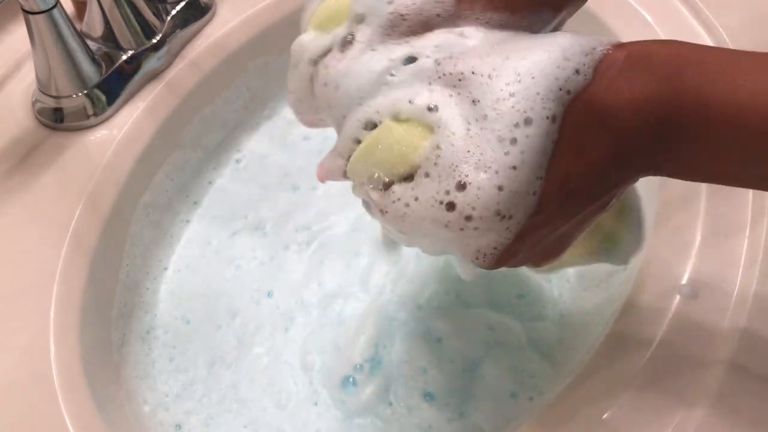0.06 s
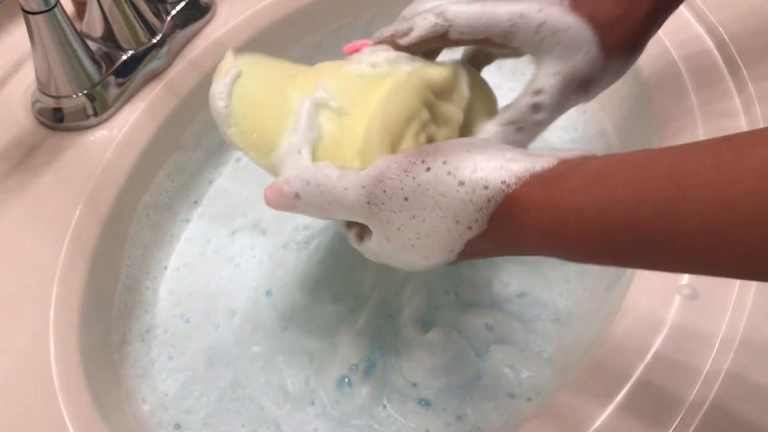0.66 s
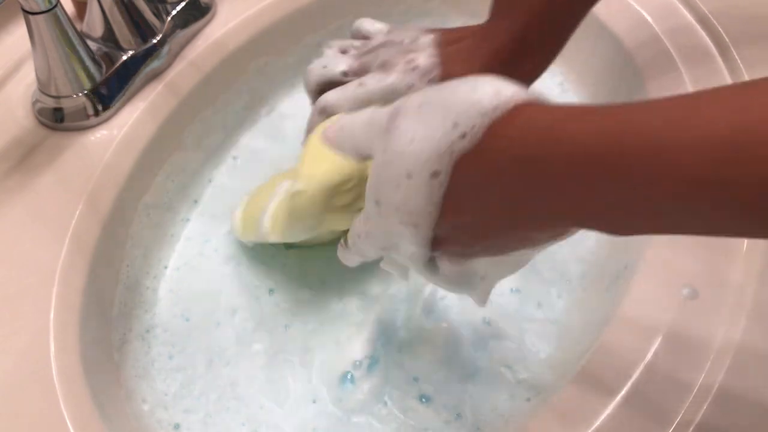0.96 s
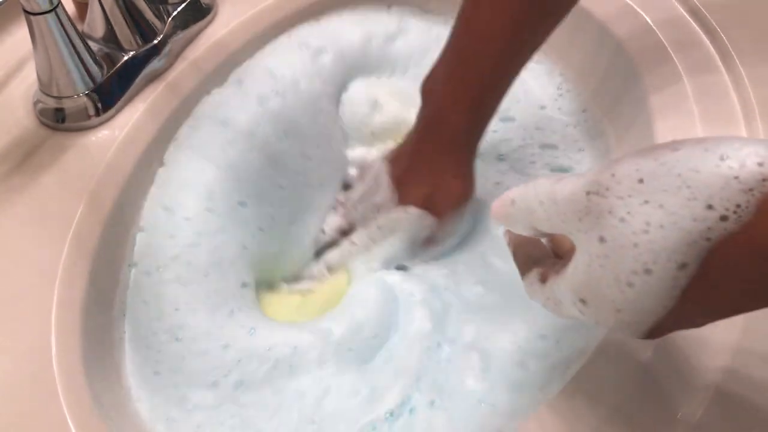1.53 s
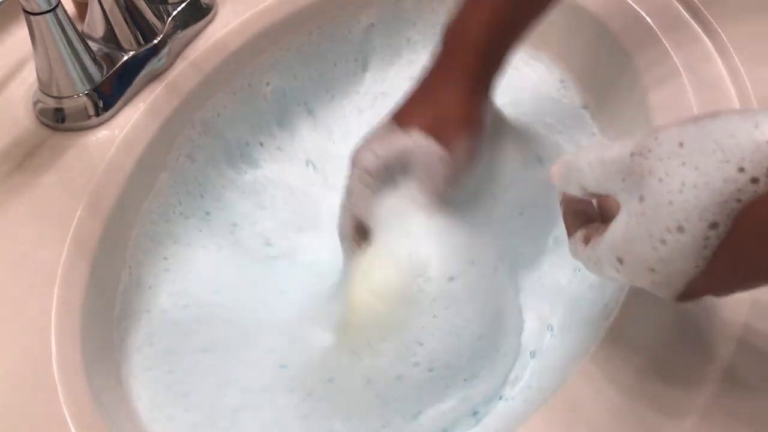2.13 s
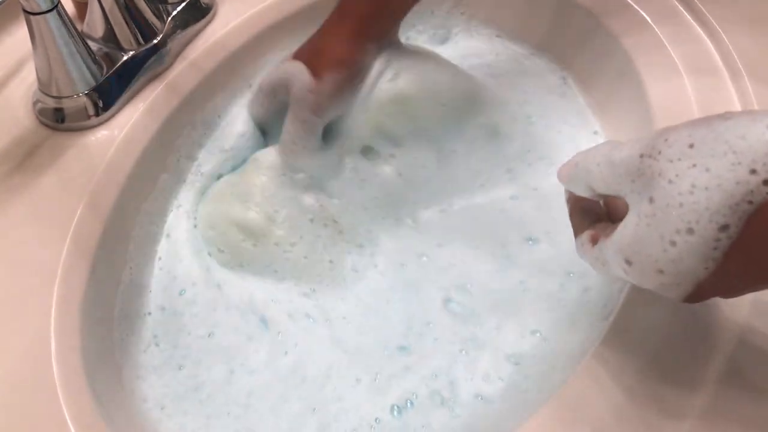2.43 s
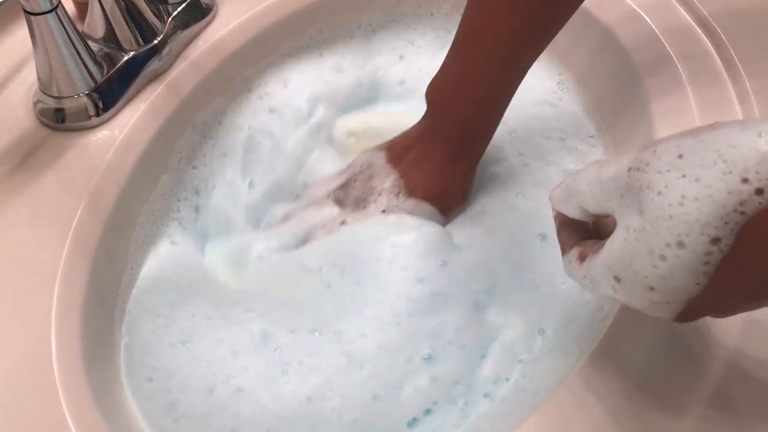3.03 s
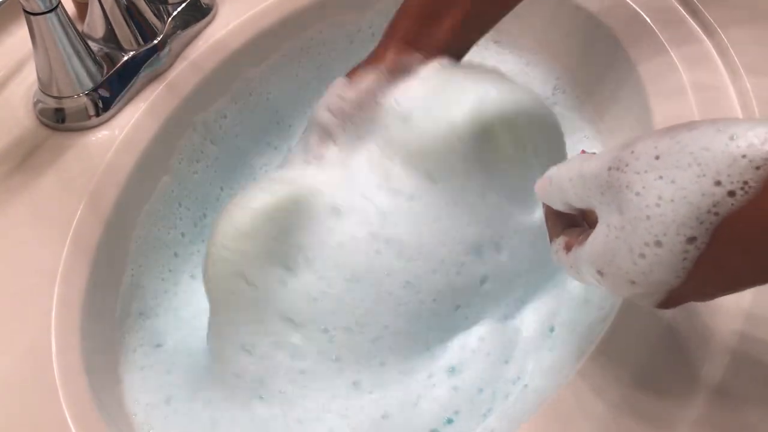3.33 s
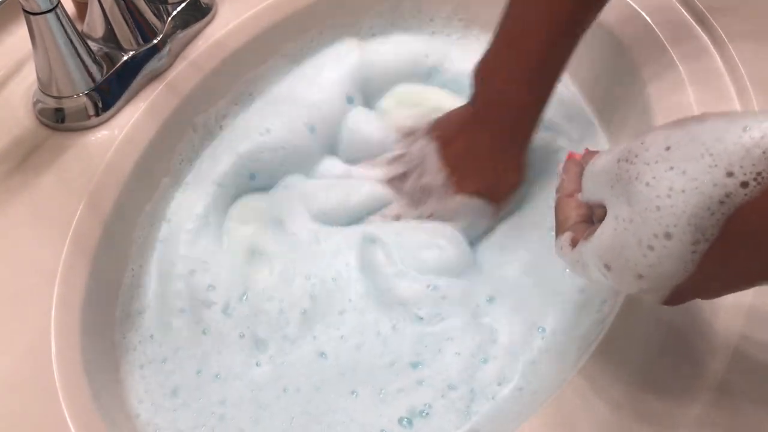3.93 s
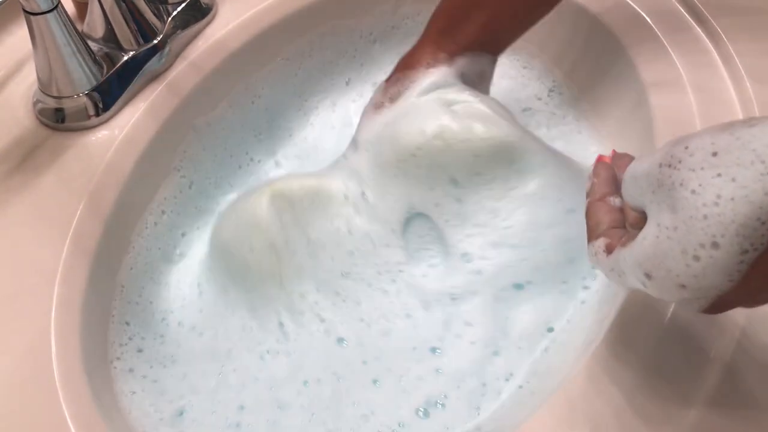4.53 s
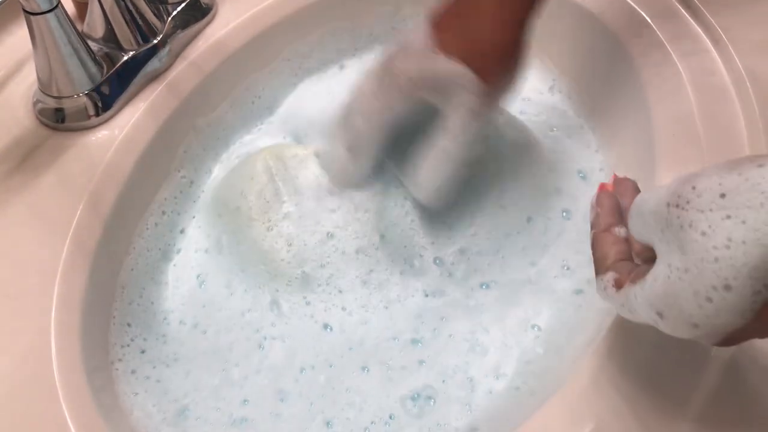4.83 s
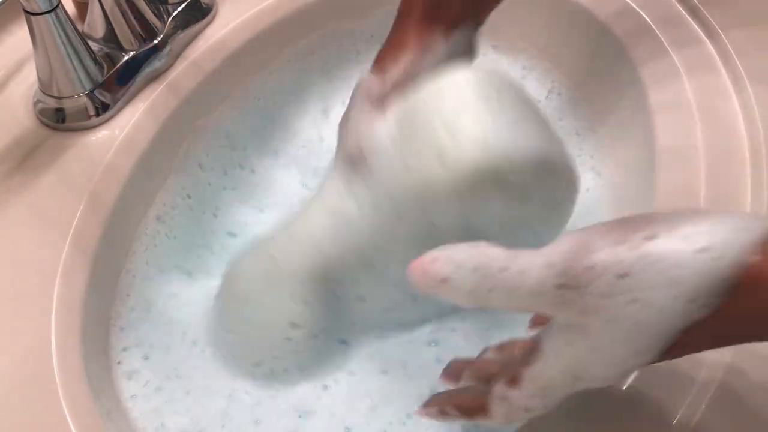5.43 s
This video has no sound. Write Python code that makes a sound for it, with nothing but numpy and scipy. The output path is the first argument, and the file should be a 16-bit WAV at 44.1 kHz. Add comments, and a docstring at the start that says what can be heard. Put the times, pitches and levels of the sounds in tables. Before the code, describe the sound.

A soapy sponge is wrung out over a sink with a wet, crackling hiss, then slurps as it is released. A hand pushes it under the foamy water and kneads it in uneven strokes, making squelches, small wet smacks and low gulps that set the basin booming softly. Water sloshes sluggishly and the foam fizzes. The sound is close, in a small bathroom with a faint hiss and hum.

```python
"""A wet, crackling hiss: a soapy sponge is wrung out over a basin, forcing air and suds through its pores.
Let go, it refills with a slurp, then is pushed under and kneaded. Each stroke squelches through the foam,
films of lather tear with a smack, and pockets of air gulp shut as the basin booms softly.
The water rocks sluggishly behind the hand, in a small hard bathroom with a faint hiss and hum."""
import sys
import numpy as np
from scipy import signal
from scipy.fft import rfft, irfft
from scipy.io import wavfile

SR = 44100
rng = np.random.default_rng(int(sys.argv[2]) if len(sys.argv) > 2 else 0)


def digitize_waveform(pressure):
    """Quantize a signal to 16-bit integers and store it at the path in sys.argv[1].

    Rows of a 2-D input are taken as channels; values are limited to [-1, 1].
    """
    field = np.atleast_2d(pressure).T
    bounded = np.clip(field, -1, 1)
    quanta = np.round(bounded * 32767).astype(np.int16)
    wavfile.write(sys.argv[1], SR, quanta)


N = 246078
TIME = np.arange(N) / SR


def from_db(db):
    """Decibels to gain."""
    return 10 ** (np.asarray(db) / 20)


def unit_power(x):
    """Scale to an rms of 1."""
    return x / np.sqrt(np.mean(x ** 2) + 1e-20)


def power_sum(*levels):
    """Unrelated sounds add in power."""
    return np.sqrt(sum(level ** 2 for level in levels))


def add(track, start_s, sound):
    """Mix a sound in at a time."""
    start = round(start_s * SR)
    track[start:start + len(sound)] += sound[:N - start]


def swell(peak_s, rise_s, fall_s):
    """An envelope that grows to 1 and dies away, exponentially on both sides."""
    distance = np.maximum((peak_s - TIME) / rise_s, (TIME - peak_s) / fall_s)
    return np.exp(-np.minimum(distance, 30))


def drift(rate_hz):
    """A random wander of rms 1, turning rate_hz times a second."""
    knots = rng.standard_normal(8192)
    return unit_power(np.interp(TIME * rate_hz, np.arange(len(knots)), knots))


def coloured(x, colour, taps=4096):
    """Minimum-phase EQ of unit power gain, following a curve of (freq_hz, gain_db)."""
    hz, db = np.transpose(colour)
    log_hz = np.log(np.maximum(np.arange(taps + 1), .5) * SR / (2 * taps))
    cepstrum = irfft(np.log(from_db(np.interp(log_hz, np.log(hz), db))))
    response = irfft(np.exp(rfft(2 * cepstrum[:taps], 2 * taps)))[:taps]
    return signal.oaconvolve(x, response / np.linalg.norm(response))[:len(x)]


def resonance(x, hz, width_hz):
    """Band-pass with gain 1 at its centre."""
    r = np.exp(-np.pi * width_hz / SR)
    feedback = [1, -2 * r * np.cos(2 * np.pi * hz / SR), r * r]
    return signal.lfilter(np.array([1, 0, -1]) * (1 - r * r) / 2, feedback, x + 1e-18)


def bubbles(colour, per_s, spread_db, q, clump_db, pitches=20):
    """Bubbles of all sizes burst in clumps, each ringing briefly at its own pitch; unit power."""
    sizes = from_db(spread_db * np.minimum(rng.exponential(1, N), 3.5)) * rng.choice([-1, 1], N)
    pops = sizes * (rng.random(N) < per_s / SR)
    pitch_index = rng.integers(0, pitches, N)
    pitches_hz = np.geomspace(colour[0][0], colour[-1][0], pitches)
    rings = sum(resonance(pops * (pitch_index == k), hz, hz / q) for k, hz in enumerate(pitches_hz))
    return unit_power(coloured(rings, colour) * from_db(clump_db * drift(110)))


# Tone of the steady hiss: freq_hz, gain_db
HISS_COLOUR = [(15, -58), (25, -6.5), (129, 3), (222, -11), (360, -20), (412, -14.5), (484, -19.5),
               (1000, -15.5), (2190, -26.5), (4060, -22), (4910, -21), (8880, -25), (10400, -22.5),
               (12900, -32), (15600, -27.5)]
# Partials of the room hum: pitch_hz, level_db
HUM_PARTIALS = [(60, -70), (96, -73.5), (120, -93)]

def room_tone(hiss_db=-63):
    """A bed of steady hiss and low, wavering hum."""
    hum = 0
    for pitch_hz, level_db in HUM_PARTIALS:
        amplitude = np.sqrt(2) * from_db(level_db + drift(2.7))
        hum += amplitude * np.sin(2 * np.pi * (pitch_hz * TIME + rng.random()))
    return hum + from_db(hiss_db) * coloured(rng.standard_normal(N), HISS_COLOUR)


def bathroom(x, t60_s=0.19, wet_db=-8, damping_hz=6000):
    """Dense, slightly dull reflections from the bowl and the close walls."""
    t = TIME[:SR // 2]
    echoes = rng.standard_normal(len(t)) * from_db(-60 * t / t60_s) * (t > .003)
    walls = signal.butter(1, damping_hz, fs=SR, output="sos")
    echoes = signal.sosfilt(walls, echoes / np.linalg.norm(echoes))
    return x + from_db(wet_db) * signal.oaconvolve(x, echoes)[:N]


# Low rumble of rocking water: freq_hz, gain_db
SLOSH_COLOUR = [(40, -12), (70, -22), (130, 1.5), (200, -3.5), (330, -12), (700, -28.5)]
# Ring of the filled basin, shared with the plunges: pitch_hz, gain_db, t60_s
BASIN_MODES = [(128, -0.5, 0.26), (160, -6.5, 0.15), (173.5, -10.5, 0.29), (252, -15, 0.19),
               (327, -18.5, 0.4), (410, -15.5, 0.27), (571.4, -16.5, 0.15), (646, -21.5, 0.19),
               (678, -32, 0.066), (743, -25.5, 0.12)]

def slosh(rocking, runoff_fall_s=0.15):
    """Rocking water and the dwindling run-off from the sponge nudge the basin at random."""
    runoff = from_db(-50.5) * np.exp(-TIME / runoff_fall_s)
    push = coloured(rng.standard_normal(N), SLOSH_COLOUR) * from_db(2 * drift(25))
    ring = sum(from_db(gain_db) * resonance(push, pitch_hz, np.log(1000) / (np.pi * t60_s))
               for pitch_hz, gain_db, t60_s in BASIN_MODES)
    return from_db(0.5) * power_sum(rocking, runoff) * unit_power(push + from_db(6.5) * ring)


# Pushes that close an air pocket under water, with levels ahead of the mix gains:
# start_s, gulp_db, pitch_hz, boom_db, t60_ratio, upper_modes_db
PLUNGE_HITS = [(0.733, -59, 169, -46.5, 0.65, -14), (0.819, -58, 167, -51.5, 0.58, 0),
               (0.851, -47, 163, -53, 0.8, -4), (0.889, -40, 173, -47.5, 0.82, -6),
               (1.207, -50, 160, -54.5, 1.2, -11), (1.257, -58, 167, -57, 1, -6),
               (1.287, -71, 160, -49.5, 0.55, -14), (1.507, -40.5, 189, -61, 0.7, -7),
               (2.028, -48, 160, -40.5, 0.69, 0.5), (2.122, -59, 160, -49, 0.6, -9),
               (2.157, -53, 160, -41.5, 0.68, -14.5), (2.48, -42.5, 183, -48, 0.98, -1),
               (2.9, -42, 175, -35.5, 1.2, -5.5), (3.157, -61, 160, -57.5, 2, -3),
               (3.349, -48.5, 196, -56.5, 0.75, 3), (3.569, -43, 243, -54, 1.1, -18),
               (3.606, -44, 173, -41.5, 0.59, -7.5), (3.768, -56, 169, -45, 0.72, -16),
               (3.952, -49, 172, -44.5, 0.95, -11), (4.019, -36.5, 171, -41, 0.99, -7.5),
               (4.343, -51, 182, -46, 0.83, -2.5), (4.499, -48, 194, -55.5, 1.1, -12),
               (4.594, -42.5, 230, -52, 0.91, -23), (4.671, -58, 170, -53, 0.64, -2),
               (4.753, -67, 160, -56.5, 0.69, -3), (4.824, -76, 160, -53.5, 1.2, -3.5),
               (5.088, -55, 174, -43, 0.72, -3), (5.141, -44.5, 266, -57, 1.3, 4),
               (5.239, -39.5, 223, -46.5, 0.55, 0), (5.345, -66, 174, -55, 1.46, -3.5)]

def plunges(peak_cycles=0.56, pitch_bend=0.13, attack_s=0.0052):
    """A pocket of air gulps for a cycle or two, falling in pitch; the push sets the basin ringing."""
    gulps, boom, t = np.zeros(N), np.zeros(N), TIME[:SR // 2]
    for start_s, gulp_db, pitch_hz, boom_db, t60_ratio, upper_modes_db in PLUNGE_HITS:
        age = t * pitch_hz / peak_cycles
        cycles = pitch_hz * t + pitch_bend * peak_cycles * (1 - np.exp(-age))
        envelope = from_db(gulp_db) * age ** 2 * np.exp(2 - 2 * age)
        add(gulps, start_s, envelope * np.sin(2 * np.pi * cycles))
        # a soft push barely reaches the upper modes, and a hand left in the water damps them all
        touches_db = upper_modes_db + 1.3 * rng.standard_normal(len(BASIN_MODES))
        touches_db[0] = 0
        for (mode_hz, gain_db, t60_s), touch_db in zip(BASIN_MODES, touches_db):
            decay = from_db(boom_db + gain_db + touch_db - 60 * t / (t60_s * t60_ratio))
            add(boom, start_s, (1 - np.exp(-t / attack_s)) * decay * np.sin(2 * np.pi * mode_hz * t))
    return from_db(1) * bathroom(gulps, t60_s=0.32, wet_db=-5.5) + from_db(6.5) * boom


def splat(colour, snap_s, spatter_s, spatter_db):
    """A snap of noise with a short spatter behind it; unit power over its first 4 ms."""
    t = TIME[:SR // 10]
    envelope = np.exp(-t / snap_s) + from_db(spatter_db) * np.exp(-t / spatter_s)
    sound = coloured(rng.standard_normal(len(t)) * envelope, colour)
    return sound / np.std(sound[:SR // 250])


# Hollow body and bright crack of a smack: freq_hz, gain_db
BODY_COLOUR = [(150, -14.5), (380, 0), (600, 2.5), (850, -5), (1300, -4), (1900, -20), (3500, -39),
               (12000, -49)]
CRACK_COLOUR = [(300, -36), (1000, -11), (1900, 1), (3200, 0.5), (7000, -2.5), (15000, -22)]
# Wet smacks of lather parting: start_s, body_db, crack_db (before muffling), muffle_hz
SMACK_HITS = [(0.1326, -61, -42, 2600), (0.4369, -48.5, -56, 4500), (0.4598, -56, -52, 4500),
              (1.0822, -57, -59, 5000), (2.026, -55, -56, 5000), (2.1185, -58.5, -61, 6000),
              (2.4667, -55, -59, 5000), (2.8835, -51, -64, 3000), (2.8995, -41, -42, 2390),
              (3.4838, -57, -73, 5000), (3.5445, -58, -70, 4000), (3.5608, -54, -73, 4000),
              (3.572, -54, -64, 5000), (3.5992, -52, -64, 4000), (3.6605, -57, -72, 4000),
              (3.9393, -54, -57, 5000), (3.955, -49.5, -49, 7960), (4.501, -58, -65, 5000),
              (4.567, -57, -61.5, 9000), (4.6373, -52.5, -57, 5000), (5.0864, -56, -65, 5000),
              (5.1421, -59.5, -63, 5000), (5.2381, -55.5, -59.5, 6000)]

def smacks():
    """A film of lather tears: a hollow body and a brighter crack, dulled by the foam above it."""
    track = np.zeros(N)
    for start_s, body_db, crack_db, muffle_hz in SMACK_HITS:
        crack = splat(CRACK_COLOUR, snap_s=0.0017, spatter_s=0.026, spatter_db=-20.5)
        crack = signal.sosfilt(signal.butter(2, muffle_hz, fs=SR, output="sos"), crack)
        body = splat(BODY_COLOUR, snap_s=0.0033, spatter_s=0.0093, spatter_db=-18)
        add(track, start_s, from_db(crack_db) * crack + from_db(body_db) * body)
    return track


# Strokes of the hand, as sends to lather and slosh:
# peak_s, rise_s, fall_s, squelch_db, crackle_db, water_db
HAND_STROKES = [(0.575, 0.03, 0.036, -62, -63, -82), (0.75, 0.031, 0.087, -61, -60.5, -71),
                (0.916, 0.062, 0.071, -55.5, -59, -66), (1.1, 0.028, 0.12, -56, -65.5, -70),
                (1.27, 0.066, 0.14, -61.5, -65.5, -54.5), (1.39, 0.068, 0.068, -64, -61, -63.5),
                (1.51, 0.065, 0.13, -60.5, -66, -60), (1.885, 0.041, 0.05, -59, -64.5, -61),
                (2.025, 0.035, 0.026, -58, -67, -55), (2.24, 0.12, 0.12, -70, -77, -63),
                (2.474, 0.025, 0.048, -53, -66.5, -64), (2.65, 0.033, 0.049, -63, -75, -77),
                (2.912, 0.021, 0.038, -53, -64.5, -63), (3.33, 0.11, 0.11, -69.5, -72, -61.5),
                (3.576, 0.04, 0.051, -54.5, -71, -58), (3.705, 0.029, 0.046, -65, -72, -62),
                (3.97, 0.032, 0.096, -61, -75, -63), (4.355, 0.064, 0.19, -66.5, -75, -66),
                (4.61, 0.056, 0.11, -63, -81, -64), (4.82, 0.2, 0.083, -70.5, -83, -66),
                (5.09, 0.036, 0.042, -62, -77, -57), (5.365, 0.04, 0.045, -66, -75, -61),
                (5.57, 0.069, 0.05, -65, -80, -71)]

def kneading(water_inertia=2.23):
    """Envelopes of squelch, crackle and rocking: each stroke swells and fades, the water more slowly."""
    squelch, crackle, rocking = from_db([-74, -73, -75])  # the basin at rest
    for peak_s, rise_s, fall_s, squelch_db, crackle_db, water_db in HAND_STROKES:
        effort = swell(peak_s, rise_s, fall_s)
        squelch = power_sum(squelch, from_db(squelch_db) * effort)
        crackle = power_sum(crackle, from_db(crackle_db) * effort)
        rocking = power_sum(rocking, from_db(water_db) * effort ** (1 / water_inertia))
    return squelch, crackle, rocking


# Wet lows, crisp highs and airy top of the foam (the sponge shares the top): freq_hz, gain_db
FOAM_SQUELCH = [(150, -8), (300, 1), (450, 1), (800, -3), (1400, -6.5), (2000, -13), (4000, -30)]
FOAM_CRACKLE = [(900, -1), (2200, -5), (3700, 0.5), (6000, -4), (9000, -9.5), (15000, -28)]
FINE_SPRAY = [(5000, -35), (8300, -6.5), (10000, -11), (11500, -6.5), (13200, -4), (15700, -7)]
# Patches of freshly turned foam collapsing: peak_s, fade_s (in and out), relative_db
FOAM_COLLAPSES = [(1.405, 0.022, -62.5), (1.46, 0.3, -71.5), (3.33, 0.09, -69), (4.33, 0.33, -69.5),
                  (5.53, 0.13, -72)]

def lather(squelch, crackle):
    """The hand ploughs through the foam, which keeps fizzing; sparser bubbles plop among the rest."""
    patches = [from_db(db) * swell(peak_s, fade_s, fade_s) for peak_s, fade_s, db in FOAM_COLLAPSES]
    fizz = power_sum(from_db(-75.5), from_db(-13) * crackle, *patches)  # resting, stirred, collapsing
    churn = squelch * bubbles(FOAM_SQUELCH, per_s=1600, spread_db=1.5, q=4.3, clump_db=2.35)
    plops = squelch * bubbles(FOAM_SQUELCH, per_s=130, spread_db=0.5, q=2.2, clump_db=0.8)
    ticks = crackle * bubbles(FOAM_CRACKLE, per_s=5000, spread_db=2, q=2.9, clump_db=1)
    mist = fizz * bubbles(FINE_SPRAY, per_s=8300, spread_db=4, q=3.5, clump_db=0.5)
    return from_db(-2.13) * churn + from_db(-7.5) * plops + from_db(1) * (ticks + mist)


def air_pocket(peak_s=0.217, centre_hz=839, octaves_per_s=22, fade_s=0.0076):
    """Bursting suds ring a pocket of air in the fist unevenly; it chirps upward as it shrinks."""
    pitch_hz = centre_hz * 2 ** np.clip(octaves_per_s * (TIME - peak_s), -1, 1)
    phase = 2 * np.pi * np.cumsum(pitch_hz) / SR
    envelope = from_db(-40) * swell(peak_s, fade_s, fade_s)
    return envelope * (drift(162) * np.sin(phase) + drift(158) * np.cos(phase))


# The squeeze of the fist, as sends to the sponge: time_s, crackle_db, spray_db
GRIP_CURVE = [(0.0, -48, -70), (0.022, -47.5, -61), (0.09, -43.5, -57), (0.104, -41.5, -52),
              (0.186, -38.5, -37.5), (0.222, -41, -51), (0.266, -46.5, -59), (0.312, -61.5, -70),
              (0.32, -56, -78)]

def wringing(release_s=0.0052):
    """Envelopes of crackle and spray as the fist tightens and lets go."""
    time_s, crackle_db, spray_db = np.transpose(GRIP_CURVE)
    release = np.exp(-np.maximum(TIME - time_s[-1], 0) / release_s)
    return [from_db(np.interp(TIME, time_s, db)) * release for db in (crackle_db, spray_db)]


# Wet mids and crisp highs of the wrung sponge: freq_hz, gain_db
SPONGE_SQUELCH = [(100, -16), (220, 0), (600, 3), (1600, 0.5), (2200, -7), (3500, -27)]
SPONGE_CRACKLE = [(900, -24), (2000, -3), (3000, 0.5), (4400, 0), (6500, -4), (9000, -8), (11000, -10.5),
                  (15500, -28)]
# Cavities of the hands and bowl: centre_hz, width_hz, gain_db
CAVITY_PEAKS = [(770, 60, -8), (1398, 32, 3.5), (1626, 48, -3.5), (3140, 69, -12), (4420, 180, -9),
                (6530, 250, -8), (8400, 160, -5), (8900, 120, -3), (11940, 200, -4), (13200, 420, -8),
                (14750, 400, -14)]

def sponge():
    """Suds are forced through the pores, coarse bubbles first, fine spray at the hardest grip."""
    grip, jet = wringing()
    refill = from_db(-56) * swell(0.35, rise_s=0.03, fall_s=0.3)  # let go, it draws air back in
    slurp = swell(0.4484, rise_s=0.019, fall_s=0.033)  # its folds come unstuck
    squelch = power_sum(from_db(-43) * grip / grip.max(), from_db(-47.5) * slurp, from_db(-10.5) * refill)
    crackle = power_sum(from_db(1) * grip, refill, from_db(-54) * slurp)
    spray = power_sum(jet, from_db(-11.5) * refill)
    coarse = squelch * bubbles(SPONGE_SQUELCH, per_s=5000, spread_db=2, q=5, clump_db=1)
    medium = crackle * bubbles(SPONGE_CRACKLE, per_s=12000, spread_db=1, q=2.6, clump_db=1.44)
    fine = spray * bubbles(FINE_SPRAY, per_s=11000, spread_db=5.5, q=6.7, clump_db=2.2)
    suds = from_db(-1.5) * coarse + from_db(-0.5) * medium + fine
    return suds + sum(from_db(db) * resonance(suds, hz, width_hz) for hz, width_hz, db in CAVITY_PEAKS)


def scene():
    """A close mono mix: suds in the bathroom's reflections, over the basin's low end and room tone."""
    squelch, crackle, rocking = kneading()
    suds = sponge() + air_pocket() + lather(squelch, crackle) + smacks()
    return (bathroom(suds) + plunges() + slosh(rocking) + room_tone())[None]


# Scoops in the microphone's treble: centre_hz, width_hz, depth_ratio
TREBLE_DIPS = [(4940, 180, 0.52), (7800, 390, 0.31), (10400, 770, 0.54)]

def record(dry, low_cut_hz=45, high_cut_hz=15800):
    """The microphone drops the deep bass and scoops the treble in places; the top is cut steeply."""
    sound = signal.sosfilt(signal.butter(2, low_cut_hz, "high", fs=SR, output="sos"), dry)
    for centre_hz, width_hz, depth_ratio in TREBLE_DIPS:
        sound = sound - depth_ratio * resonance(sound, centre_hz, width_hz)
    return signal.sosfilt(signal.ellip(12, .1, 70, high_cut_hz, fs=SR, output="sos"), sound)


dry = scene()
out = record(dry)
digitize_waveform(out)
```